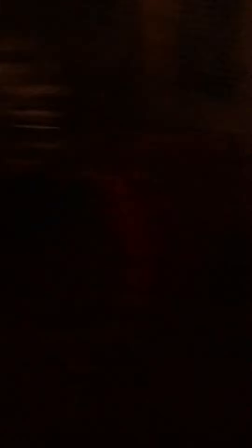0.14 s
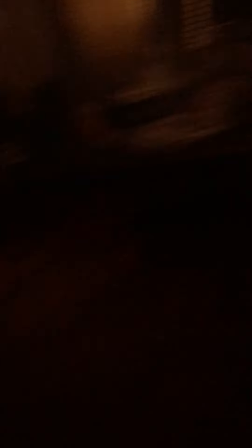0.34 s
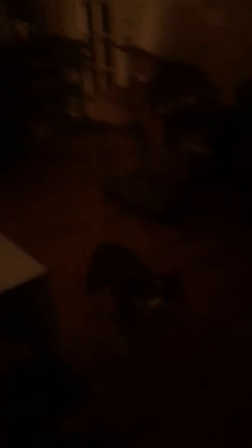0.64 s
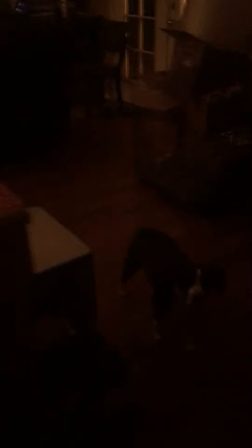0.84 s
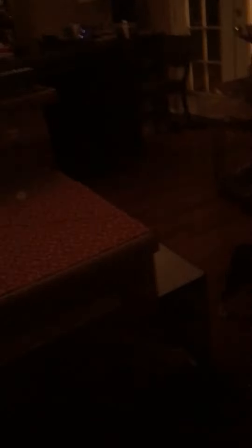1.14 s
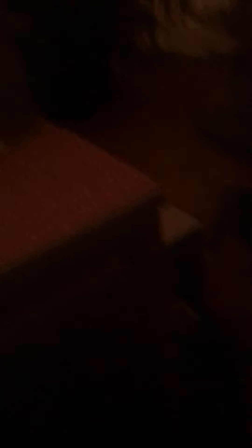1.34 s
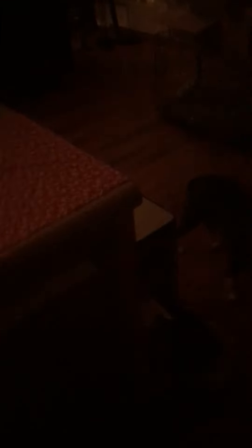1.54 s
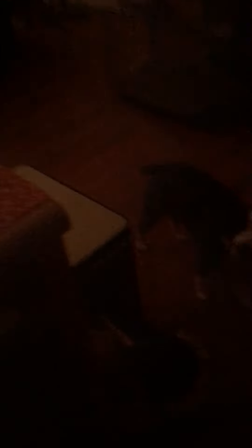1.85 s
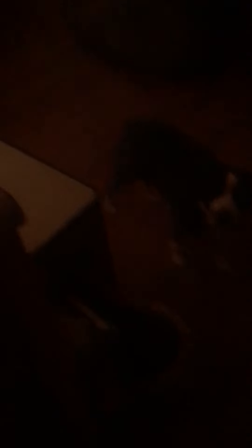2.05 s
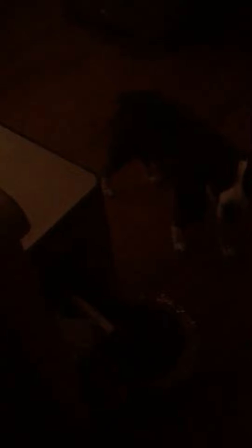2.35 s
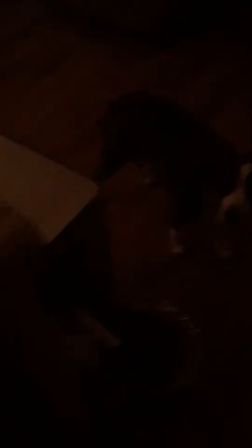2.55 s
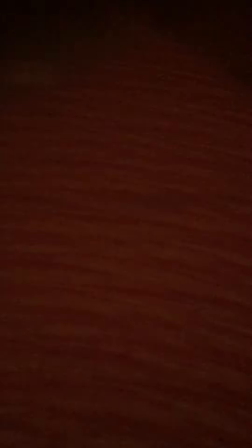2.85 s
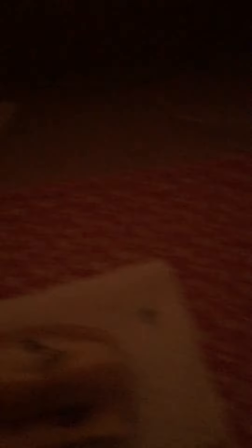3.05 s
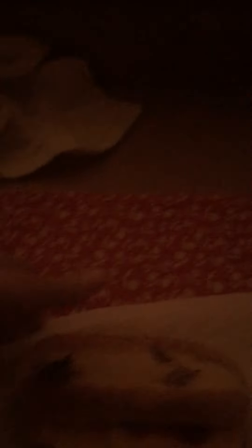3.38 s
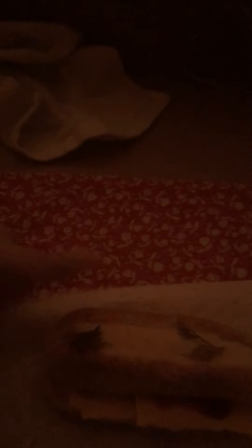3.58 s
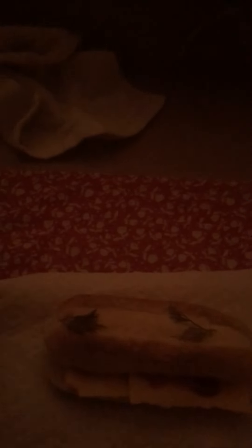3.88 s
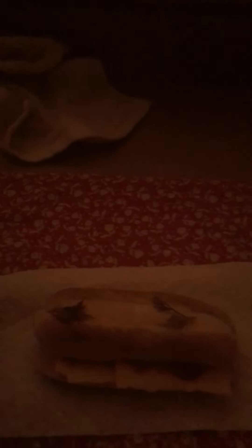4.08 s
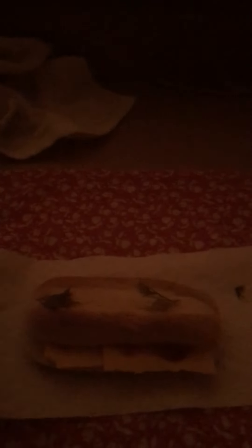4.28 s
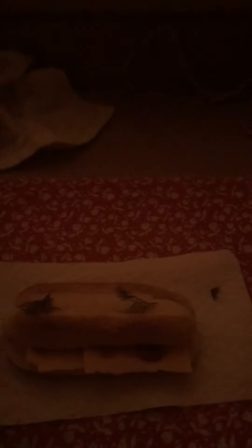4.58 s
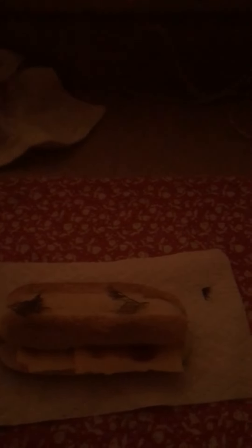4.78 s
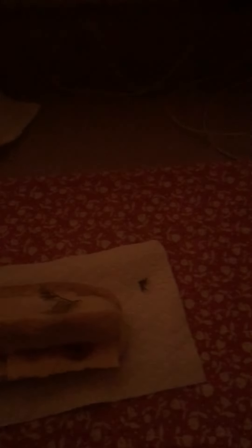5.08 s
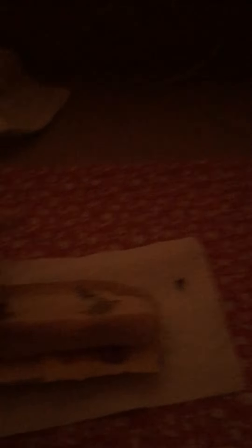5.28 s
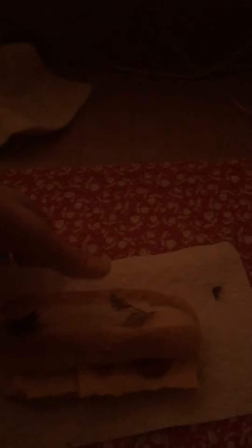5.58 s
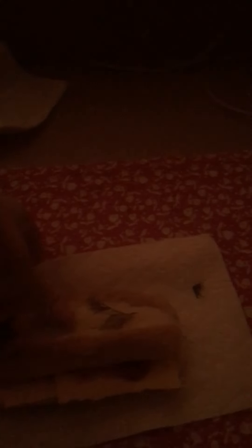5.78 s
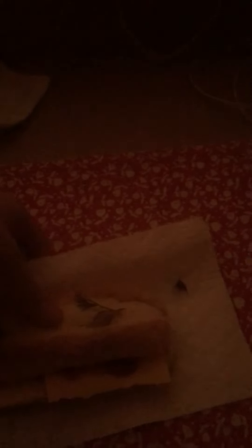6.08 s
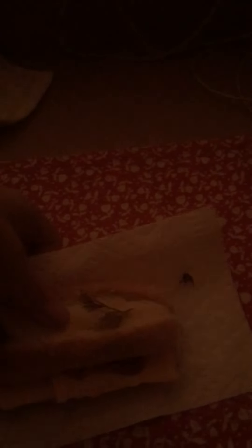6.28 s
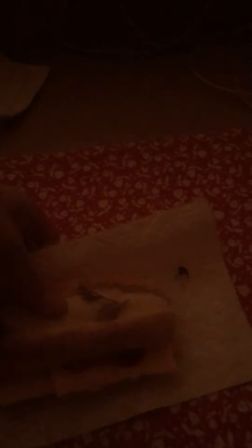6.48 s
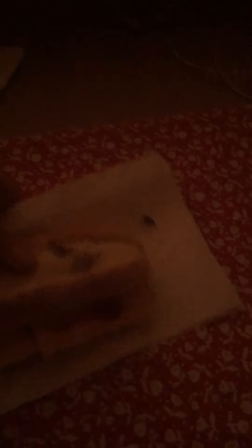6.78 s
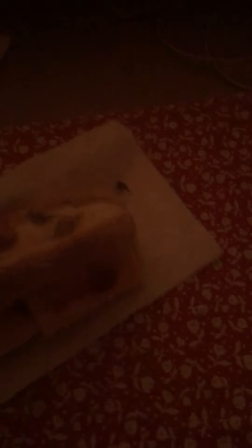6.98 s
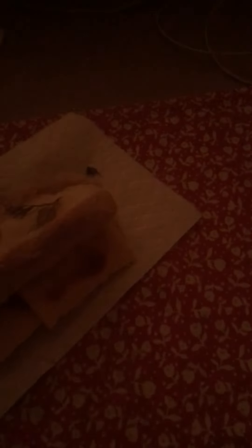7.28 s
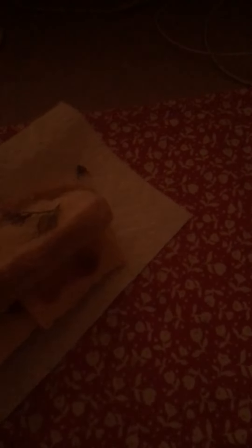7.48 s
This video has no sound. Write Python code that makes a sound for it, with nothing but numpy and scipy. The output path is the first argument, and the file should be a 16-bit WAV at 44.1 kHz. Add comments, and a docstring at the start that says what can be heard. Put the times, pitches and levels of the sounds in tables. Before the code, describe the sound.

A refrigerator door thumps shut in a small kitchen, then cloth swishes, faint footsteps, and close paper-towel rasps and light taps over a low hum.

```python
"""Refrigerator door and a sandwich on a paper towel

Small kitchen: a refrigerator door thumps shut, ringing in its panels, and the microphone is walked away
with cloth swishes and faint footsteps, which are shaped noise. Close up at a table, a hand slides and turns
a sandwich on a paper towel (rasping noise, crumples, snaps), things tap and fingers bump the microphone's case.
The refrigerator hums throughout on steady lines; over the last two seconds a fan motor runs up to speed."""
import sys
import numpy as np
from scipy import signal
from scipy.fft import rfft, irfft, next_fast_len
from scipy.io import wavfile

SR = 44100
rng = np.random.default_rng(int(sys.argv[2]) if len(sys.argv) > 2 else 0)


def transcribe(u):
    """Save the signal u as a 16-bit wav file named by the first command-line argument.

    u: samples, shape (n,) or (channels, n), limited to [-1, 1]; the rate is SR.
    q: integer samples, one column per channel.
    """
    v = np.clip(np.atleast_2d(u).T, -1, 1)
    q = np.round(v * 32767).astype(np.int16)
    wavfile.write(sys.argv[1], SR, q)


N = 336483
TIME = np.arange(N) / SR   # s


def from_db(db):
    """Decibels to gain."""
    return 10 ** (np.asarray(db) / 20)


def rms_one(x):
    """Scale to rms 1."""
    return x / np.sqrt(np.mean(x ** 2) + 1e-20)


def in_time(rows):
    """Each column of a curve, joined by straight lines, at every sample."""
    s, *columns = np.transpose(rows)
    return [np.interp(TIME, s, column) for column in columns]


def at_hz(points, hz):
    """Read a table on a log-frequency axis."""
    table = np.array(points)
    return np.interp(np.log(hz), np.log(table[:, 0]), table[:, 1])


def noise(spectrum, size=N):
    """Noise of a given colour, falling steeply beyond the table's ends; rms 1."""
    padded = next_fast_len(size)
    hz = np.maximum(np.arange(padded // 2 + 1) * SR / padded, 1)
    skirts = np.minimum(1, np.minimum(hz / spectrum[0][0], spectrum[-1][0] / hz)) ** 4
    white = rfft(rng.standard_normal(padded))
    coloured = irfft(white * from_db(at_hz(spectrum, hz)) * skirts, padded)
    return rms_one(coloured[:size])


def drift(rate, size=N):
    """Slow chance: random values of spread 1, `rate` of them a second, joined by straight lines."""
    return np.interp(TIME[:size] * rate, np.arange(size), rng.standard_normal(size))


def add(out, s, sound):
    """Mix a sound in at a time."""
    at = int(np.clip(round(s * SR), 0, N - 1))
    out[at:at + len(sound)] += sound[:N - at]


def ring(force, hz, t60):
    """A damped resonance: a unit click sets a sine of about height 1 ringing."""
    r = from_db(-60 / (t60 * SR))   # decay per sample
    w = 2 * np.pi * hz / SR
    return signal.lfilter([0, np.sin(w)], [1, -2 * r * np.cos(w), r * r], force + 1e-18)


def swells(rows):
    """Envelope of movements that each build up as a bell curve and die away exponentially; powers add."""
    power = 0
    for s, db, rise, fall in rows:
        since = TIME - s
        steepness = np.where(since < 0, (since / rise) ** 2, since / fall)
        power = power + from_db(2 * db) * np.exp(-2 * steepness.clip(0, 40))
    return np.sqrt(power)


# how long the small kitchen holds a sound: (f/Hz, t60/s)
KITCHEN_T60 = [(60, 1), (250, 0.41), (800, 0.63), (2000, 1), (5000, 0.91), (9000, 0.68), (16000, 0.084)]


def reverberation(spectrum, build_s):
    """One second of diffuse kitchen sound, each octave dying at its own rate; rms 1 before it builds and dies."""
    t = TIME[:SR]
    bins = rfft(noise(spectrum, size=SR))
    octave = np.log2(np.maximum(np.arange(len(bins)), 1) / 20).clip(0, 10)
    tail = 0
    for k in range(11):
        band = irfft(bins * np.maximum(1 - abs(octave - k), 0), SR)
        tail = tail + band * from_db(-60 * t / at_hz(KITCHEN_T60, 20 * 2 ** k))
    return tail * (1 - np.exp(-t / build_s))


# compressor as the microphone is carried off: (t/s, hum level/dB, drone level/dB)
COMPRESSOR_LEVELS = [(0, -62.5, -57), (2, -57.5, -67), (3.5, -62, -63.5), (7.63, -62.5, -82)]
# its hum lines: (f/Hz, level/dB relative to the hum level)
HUM_LINES = [(59.2, 0), (118.4, -16), (210, -13), (236.9, -13), (355.3, -12), (414.5, -17), (473.7, -20)]
# the airy whirr, left behind: (t/s, level/dB)
WHIRR_LEVELS = [(0, -52), (.8, -56.5), (1.2, -54.5), (2.0, -61.5), (2.8, -68), (7.63, -81)]
# colour of the whirr: (f/Hz, relative level/dB per Hz)
WHIRR_COLOUR = [(100, 9), (180, -3), (800, -7), (2200, -19), (14000, -63)]
DRONE_HZ, RUMBLE_DB = 63.8, -1   # rumble is relative to the drone
HUM_WAVER_DB = 2.2


def refrigerator(wander_hz=1.06):
    """Compressor lines near the mains rate, a low drone beating against them, and moving air."""
    hum_db, drone_db = in_time(COMPRESSOR_LEVELS)
    lines = 0
    for hz, db in HUM_LINES:
        waver = from_db(db + HUM_WAVER_DB * drift(3.57))
        lines = lines + waver * np.sin(2 * np.pi * (hz * TIME + rng.random()))
    drone_hz = DRONE_HZ + wander_hz * drift(1.994)
    tone = np.sqrt(2) * np.sin(2 * np.pi * np.cumsum(drone_hz) / SR)
    rumble = from_db(RUMBLE_DB) * noise([(48, -16), (62, -1), (72, 5.0), (95, -13)])
    drone = from_db(drone_db) * (tone + rumble)
    whirr = from_db(in_time(WHIRR_LEVELS)[0]) * noise(WHIRR_COLOUR)
    return np.sqrt(2) * from_db(hum_db) * lines + drone + whirr


# background of the kitchen: (f/Hz, relative level/dB per Hz)
ROOM_COLOUR = [(42, -5.5), (65, -4.5), (237, -3), (360, -7), (585, -20), (1550, -26.5), (6170, -30),
               (16000, -39)]


def room_background(level_db):
    """Steady, mostly low noise of the room."""
    return from_db(level_db) * noise(ROOM_COLOUR)


# clothes beside the carried microphone: (t/s, level/dB before flutter, rise/s)
CLOTH_SWISHES = [(.157, -62, 0.0061), (.512, -59.5, 0.011), (0.561, -55.5, 0.016), (.965, -61, 0.015),
                 (1.04, -61, 0.017), (1.13, -66.5, 0.036), (1.31, -57, 0.019), (1.485, -59.5, 0.027),
                 (1.601, -49.5, 0.021), (1.684, -46, 0.029), (2.455, -65.5, 0.041)]
# colour of the cloth: (f/Hz, relative level/dB per Hz)
CLOTH_COLOUR = [(700, -3.5), (1400, -4.5), (2900, -3), (3400, 4.5), (4700, -0.5), (5600, 2.5), (7500, -3),
                (9300, -7), (10300, -15.5), (11800, -9), (16000, -20)]
# footsteps: (t/s, sole scuff level/dB, thud level/dB)
FOOTSTEPS = [(.01, -46.5, -57), (.975, -56.5, -54), (1.484, -57.5, -68), (2.23, -88, -49.5),
             (2.93, -77, -51.5)]
# colour of the scuffing sole: (f/Hz, relative level/dB per Hz)
SOLE_COLOUR = [(370, -20), (800, 0), (1400, 2), (4200, -23.5), (12000, -35)]
SWISH_FALL_PER_RISE = 1.96
SOLE_RISE_S, SOLE_FALL_S, THUD_RISE_S, THUD_FALL_S = 0.018, 0.033, 0.027, 0.2


def walking(flutter_db=1.0):
    """Cloth swishes, with a fall time about twice its rise time; soles scuff and thud faintly."""
    moves = swells([(s, db, rise, SWISH_FALL_PER_RISE * rise) for s, db, rise in CLOTH_SWISHES])
    cloth = moves * noise(CLOTH_COLOUR) * from_db(flutter_db * drift(400))
    scuffs = swells([(s, db, SOLE_RISE_S, SOLE_FALL_S) for s, db, _ in FOOTSTEPS])
    thuds = swells([(s, db, THUD_RISE_S, THUD_FALL_S) for s, _, db in FOOTSTEPS])
    thud_noise = noise([(30, -5), (38, 6), (55, 18), (110, -15)])
    return cloth + scuffs * noise(SOLE_COLOUR) + thuds * thud_noise


# door meeting the cabinet, then rebounds and shelves knocking:
# (t/s, relative push level/dB, contact time scale/s, relative slap level/dB)
DOOR_CONTACTS = [(0.2372, -2, 0.00074, -9), (0.2437, -16, 0.00049, -15), (0.2443, 5, 0.0011, 2.5),
                 (0.2469, -6, 0.0005, -1), (.268, -11, 0.0017, -22), (0.333, -16.5, 0.00082, -22),
                 (.361, -18, .0014, -31)]
# ringing of door and cabinet panels: (f/Hz, relative level/dB, t60/s)
PANEL_MODES = [(58, -22.5, .27), (197, -19, .32), (254, -40, .42), (348, -30.5, .26), (545, -39, .3),
               (602, -31.5, .3), (679, -33, .28), (711, -32, .24), (772, -33, .3), (835, -35, .3),
               (885, -38, .3), (1075, -33, .22), (1225, -32, .2), (1816, -38, .13), (2210, -35, .1)]
# sharp slap of the seal: (f/Hz, relative level/dB per Hz)
SLAP_COLOUR = [(200, -3), (750, 4), (1550, -8), (1950, -3.5), (2500, -3.5), (3600, -13), (5400, -11),
               (7000, -17), (9500, -15), (11000, -26), (16000, -33)]
# the kitchen's answer to the door: (f/Hz, relative level/dB per Hz)
ECHO_COLOUR = [(60, -21), (115, -0.5), (165, -9), (230, 1), (400, -7.5), (750, -3), (1200, -12.5),
               (2200, -22.5), (3000, -29.5), (5500, -30.5), (16000, -44.5)]


def door(body_db=-4, crack_db=-21, crack_s=0.0021, rattle_db=-31, rattle_s=0.031, echo_db=-31,
         radiates_above_hz=42, chatter_db=5.0):
    """The seal lands edge by edge; each contact slaps and pushes the panels, and the shelves rattle."""
    force, out, t = np.zeros(N), np.zeros(N), TIME[:SR // 4]
    for s, push_db, contact_s, slap_db in DOOR_CONTACTS:
        push = t * np.exp(-2 * np.pi * t / contact_s)   # a longer contact is duller
        add(force, s, from_db(push_db) * push / push.sum())
        slap = noise(SLAP_COLOUR, size=len(t)) * np.exp(-t / crack_s)
        add(out, s, from_db(crack_db + slap_db) * slap)
    panels = 0
    for k, (hz, db, t60) in enumerate(PANEL_MODES):
        panels = panels + from_db(db) * ring(force, hz, t60) * (-1) ** k   # neighbours in opposite phase
    radiation = signal.butter(3, radiates_above_hz, "high", fs=SR, output="sos")
    out += from_db(body_db) * signal.sosfilt(radiation, panels)
    shut_s = DOOR_CONTACTS[2][0]   # the hardest contact
    chatter = rms_one(from_db(chatter_db * drift(340)))[:len(t)]   # loose things knock unevenly
    rattle = chatter * noise(SLAP_COLOUR, size=len(t)) * np.exp(-t / rattle_s)
    add(out, shut_s, from_db(rattle_db) * rattle)
    add(out, shut_s, from_db(echo_db) * reverberation(ECHO_COLOUR, build_s=0.00082))
    return out


# things handled near the microphone:
# (t/s, contact level/dB before its envelope, f/Hz, decay/s, ring level/dB before its envelope)
LIGHT_TAPS = [(1.29, -48.5, 1060, 0.021, -59), (1.983, -58, 1360, 0.039, -73),
              (2.463, -43, 1400, 0.0038, -56), (2.734, -65, 2140, 0.016, -62),
              (2.914, -62, 1780, 0.0048, -56), (6.556, -42, 1050, 0.0065, -44.5),
              (7.48, -53.5, 996, .01, -51), (7.492, -41, 1400, 0.0062, -46),
              (7.599, -43.5, 1750, 0.002, -45)]
TAP_ATTACK_S = .0005


def taps(low_db=-14, bright_db=-13, top_db=-26):
    """A light contact gives a broad click and one pitched, quickly damped ring."""
    out, t = np.zeros(N), TIME[:SR // 8]
    for s, db, hz, decay_s, ring_db in LIGHT_TAPS:
        colour = [(hz / 3, low_db), (hz / 1.4, -1), (hz * 1.15, 0), (hz * 3.5, bright_db), (hz * 10, top_db)]
        click = from_db(db) * noise(colour, size=len(t))
        pitched = from_db(ring_db) * np.sin(2 * np.pi * hz * t)
        add(out, s, (click + pitched) * (1 - np.exp(-t / TAP_ATTACK_S)) * np.exp(-t / decay_s))
    return out


# fingers on the microphone's case, levels before the envelopes and dulling:
# (t/s, knock level/dB, f/Hz, slips, slip spacing/s, tick level/dB, thump level/dB)
CASE_BUMPS = [(2.19, -33.5, 500, 3, 0.0065, -53, -67), (2.211, -42, 338, 3, 0.014, -63, -58),
              (2.3653, -35, 470, 1, .006, -58, -48), (3.8455, -42, 512, 3, 0.00653, -57.5, -43.5),
              (3.878, -43, 660, 2, .006, -59, -48)]
# what the case rings with: (multiple of the bump's f, relative level/dB, t60/s)
CASE_RINGS = [(.68, 4, 0.015), (1, 5.5, 0.015)]
THUMP_HZ, THUMP_T60_S = 177, 0.054
KNOCK_BUILD_S, CASE_DULL_HZ = .0012, 720


def bumps():
    """A fingertip sticks and slips on the case: each slip is a tiny tick, a dull, hollow ring and a soft thump."""
    out, t = np.zeros(N), TIME[:SR // 8]
    dull = signal.butter(4, CASE_DULL_HZ, fs=SR, output="sos")
    for s, db, hz, count, gap_s, tick_db, thump_db in CASE_BUMPS:
        knock = 0
        for ratio, mode_db, t60 in CASE_RINGS:
            knock = knock + np.sin(2 * np.pi * hz * ratio * t) * from_db(db + mode_db - 60 * t / t60)
        thump = np.sin(2 * np.pi * THUMP_HZ * t) * from_db(thump_db - 60 * t / THUMP_T60_S)
        thud = signal.sosfilt(dull, (knock + thump) * (1 - np.exp(-t / KNOCK_BUILD_S)))
        for k in range(int(round(count))):
            tick = noise([(1200, 0), (4000, -5), (7000, -9), (14000, -29)], size=len(t))
            add(out, s + k * gap_s, thud + from_db(tick_db) * tick * np.exp(-t / 0.0024))
    return out


# strokes of the paper towel over the cloth, right at the microphone:
# (start t/s, length/s, mid-stroke base level/dB, growth over the stroke/dB,
#  gain of body and air/dB, rasp f/Hz, rasp gain/dB)
TOWEL_STROKES = [(3.25, 0.18, -67, -4, -8, 2250, -2), (3.379, .16, -50.5, 2, -6, 5400, -14),
                 (3.536, 0.16, -57, 3.5, -5, 3500, -3), (3.816, 0.18, -64, 19, -1.5, 4000, 0.5),
                 (4.01, 0.15, -66.5, 1, -5, 3300, -20), (4.532, 0.049, -65.5, 5, -0.5, 3470, 6.5),
                 (4.59, .07, -73, 4, 2, 5600, 1), (4.977, 0.42, -68, 11.5, -0.5, 3280, -13),
                 (5.431, 0.2, -61.5, 5, 1, 2260, -6), (5.65, 0.059, -53.5, -7, -5.5, 2400, -20),
                 (5.766, 0.197, -66, -8, -3, 4070, 2.5), (6.467, 0.091, -65, 5, 6, 2200, 4),
                 (6.589, 0.15, -69.5, -6, 6.5, 2310, 4.5), (6.74, .16, -62.5, 4, 5, 2400, -2),
                 (6.886, 0.44, -65, -9.5, 3, 2350, -22), (7.387, 0.13, -64, 2, 0, 1660, 6.5)]
# colour of the sliding towel: (f/Hz, relative level/dB per Hz)
TOWEL_COLOUR = [(500, -6), (1000, 0), (1400, -3), (2250, 3.5), (2900, 1), (3600, 4), (4850, -2.5),
                (5700, 2.5), (7400, -3.5), (8700, -4.5), (10200, -11), (11700, -8.5), (16000, -16)]
STROKE_ATTACK_SHARE, STROKE_RELEASE_S = 0.11, 0.013   # attack is a share of the stroke's length
BODY_HZ, AIR_HZ = 2200, 7300   # body lies below, air above
RASP_WIDTH_HZ = 580   # width of the resonance of a fold in the towel


def paper(grain_db=1.5, catch_db=1.5, patchy_db=2.2, snaps_per_s=900, snap_db=-4.5):
    """In each stroke the towel starts, slides and stops; fibres snap in its hiss and its fold rasps at its own pitch."""
    fibre_snaps = rms_one(rng.standard_normal(N) * (rng.random(N) < snaps_per_s / SR))
    roughness = from_db(grain_db * drift(900) + catch_db * drift(60))
    friction = (rng.standard_normal(N) + from_db(snap_db) * fibre_snaps) * roughness
    out, t = np.zeros(N), TIME[:SR]
    hz = np.maximum(np.arange(SR // 2 + 1), 1)
    colour = from_db(at_hz(TOWEL_COLOUR, hz)) * np.minimum(1, hz / TOWEL_COLOUR[0][0]) ** 4
    edges = 1 / (1 + (hz / BODY_HZ) ** 4) + 1 / (1 + (AIR_HZ / hz) ** 4)   # body and air
    for s, length_s, db, growth_db, breadth_db, rasp_hz, rasp_db in TOWEL_STROKES:
        bins = rfft(np.roll(friction, -int(s * SR))[:SR]) * colour
        bins = bins / irfft(bins, SR).std()
        rasp = 1 / (1 + (2 * (hz - rasp_hz) / RASP_WIDTH_HZ) ** 2)
        hiss = 0
        for band, gain_db in ((edges, breadth_db), (1 - edges, 0), (rasp, rasp_db)):
            patches = from_db(gain_db + patchy_db * drift(23.4, size=SR))
            hiss = hiss + irfft(bins * band, SR) * patches
        attack = 1 - np.exp(-t / (STROKE_ATTACK_SHARE * length_s))   # long strokes start gently
        hold = from_db(db + growth_db * (np.minimum(t / length_s, 1) - .5))
        release = np.exp(-np.maximum(t - length_s, 0) / STROKE_RELEASE_S)
        add(out, s, hiss * attack * hold * release)
    return out


# the towel crumples under the fingers: (middle t/s, peak level/dB before grain, half length/s, f/Hz)
CRUMPLES = [(3.986, -62, 0.0051, 3300), (4.096, -58, 0.0065, 3040), (4.279, -57.5, 0.01, 3270),
            (4.303, -57, 0.0061, 2650), (4.479, -62.5, 0.017, 2140), (4.833, -66, 0.017, 2780),
            (5.366, -58, 0.0096, 1090), (5.991, -55.5, 0.014, 2300), (6.077, -63.5, 0.015, 1640)]
# colour of a crumple: (multiple of its f, relative level/dB per Hz)
CRUMPLE_COLOUR = [(.33, -1.5), (1.15, 7), (1.8, 0), (3.5, -8), (10, -20)]


def crinkles(grain_db=3.0):
    """Each crumple is a short, grainy swell of noise coloured around its own pitch."""
    out, t = np.zeros(N), TIME[:SR // 5]
    middle = t.mean()
    for s, db, half_s, hz in CRUMPLES:
        fibres = noise([(hz * ratio, colour_db) for ratio, colour_db in CRUMPLE_COLOUR], size=len(t))
        swell = np.exp(-((t - middle) / half_s) ** 2 / 2)
        add(out, s - middle, from_db(db) * fibres * swell)
    return out * rms_one(from_db(grain_db * drift(1400)))


# single creases snapping close by: (t/s, initial level/dB)
CREASE_SNAPS = [(4.285, -43), (4.3644, -53), (4.373, -50), (4.394, -48), (4.411, -47.5), (4.4154, -45.5),
                (5.973, -55)]
# colour of a snap: (f/Hz, relative level/dB per Hz)
SNAP_COLOUR = [(900, -1), (2400, 1), (4800, -8.5), (16000, -15)]
SNAP_DECAY_S = .0017


def snaps():
    """A crease flips over with one dry tick."""
    out, t = np.zeros(N), TIME[:SR // 20]
    for s, db in CREASE_SNAPS:
        add(out, s, from_db(db) * noise(SNAP_COLOUR, size=len(t)) * np.exp(-t / SNAP_DECAY_S))
    return out


# resonances of the fan's duct: (f/Hz, relative level/dB)
DUCT_RESPONSE = [(70, -16), (103, -8), (130, -3), (150, -14), (178, -2), (200, 2), (218, -15), (288, -15),
                 (303, 1.5), (313, -11), (330, .5), (355, 1.5), (425, -16)]
# air through the fan: (f/Hz, relative level/dB per Hz)
AIR_COLOUR = [(70, -5), (108, -13), (140, -5), (200, 4), (270, -3), (350, -0.5), (455, -17), (2000, -25.5)]
FAN_START_S, SPIN_UP_S, BLADE_HZ, BUZZ_HZ = 5.43, .36, 111.3, 120   # blade rate at full speed
FAN_WAVER_DB, FOURTH_TONE_DB = 1.3, -3.5
DUCT_NOTE_HZ, DUCT_NOTE_DB = 210, -62.5   # grows once the fan is near full speed


def fan(tone_db=-60.0, air_db=-60.5, start_buzz_db=-61.0, run_buzz_db=-68):
    """Windings buzz under starting current; blade tones rise through the duct's resonances as the rotor speeds up."""
    running_s = np.maximum(TIME - FAN_START_S, 0)
    speed = 1 - np.exp(-running_s / SPIN_UP_S)   # share of full speed
    blade_hz = np.maximum(BLADE_HZ * speed, 1)
    turn = 2 * np.pi * np.cumsum(blade_hz) / SR
    tones = 0
    for k in range(1, 5):
        duct_db = at_hz(DUCT_RESPONSE, k * blade_hz) + FOURTH_TONE_DB * (k == 4)
        tones = tones + from_db(tone_db + duct_db + FAN_WAVER_DB * drift(8)) * np.sin(k * turn)
    buzz_db = start_buzz_db + (run_buzz_db - start_buzz_db) * speed ** 4 + FAN_WAVER_DB * drift(9)
    buzz = from_db(buzz_db) * np.tanh(running_s / 0.066) * np.sin(2 * np.pi * BUZZ_HZ * TIME)
    note_level = from_db(DUCT_NOTE_DB + FAN_WAVER_DB * drift(13)) * speed ** 10
    note = note_level * np.sin(2 * np.pi * DUCT_NOTE_HZ * TIME)
    air = from_db(air_db) * speed ** 2 * noise(AIR_COLOUR)
    return np.sqrt(2) * (speed * tones + buzz + note) + air


def scene(room_db=-12, towel_room_db=-19, floor_db=-61.5):
    """Door, small sounds with a little room (least for the towel, right at the microphone), and the machines."""
    background = refrigerator() + room_background(floor_db) + fan()
    near = walking() + taps() + bumps()
    towel = paper() + crinkles() + snaps()
    walls = reverberation([(100, 0), (16000, 0)], build_s=0.0022)
    walls = walls / np.linalg.norm(walls)
    wet = signal.fftconvolve(from_db(room_db) * near + from_db(towel_room_db) * towel, walls)[:N]
    return (door() + near + towel + wet + background)[None]


def record(dry):
    """The microphone loses the deepest bass; the top is cut above 15.9 kHz."""
    bass_loss = signal.butter(2, 32, "high", fs=SR, output="sos")
    top_cut = signal.ellip(10, .1, 80, 15900, fs=SR, output="sos")
    return signal.sosfilt(top_cut, signal.sosfilt(bass_loss, dry))


dry = scene()
out = record(dry)
transcribe(out)
```